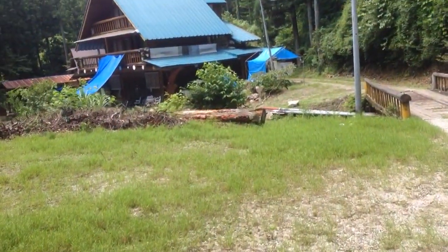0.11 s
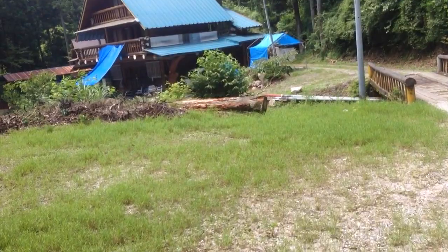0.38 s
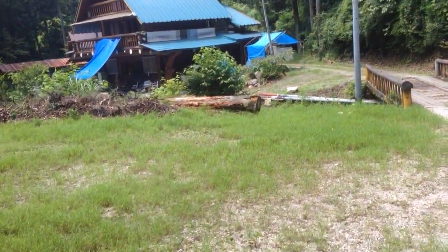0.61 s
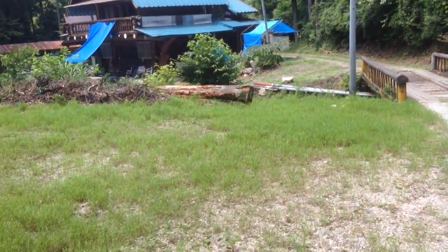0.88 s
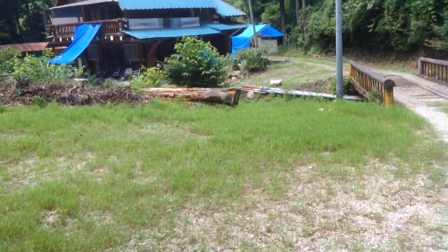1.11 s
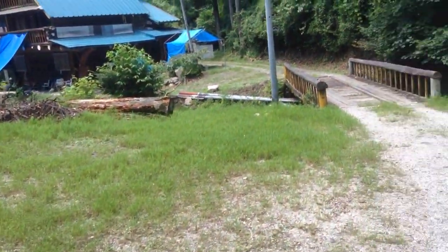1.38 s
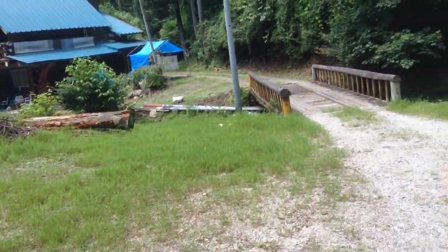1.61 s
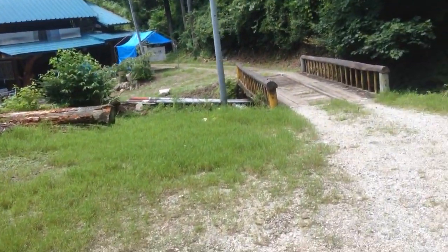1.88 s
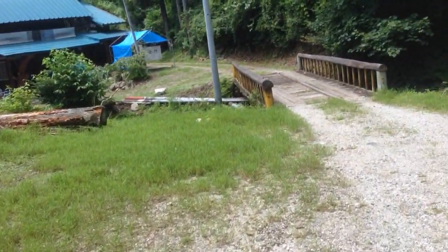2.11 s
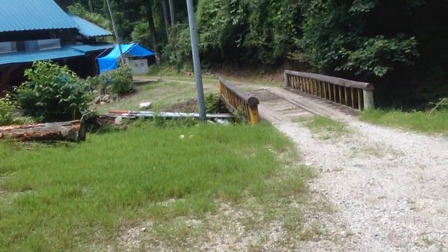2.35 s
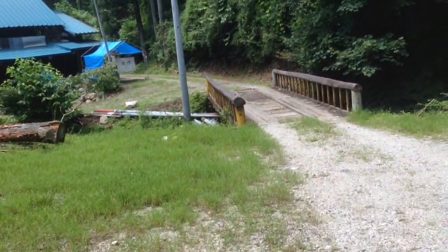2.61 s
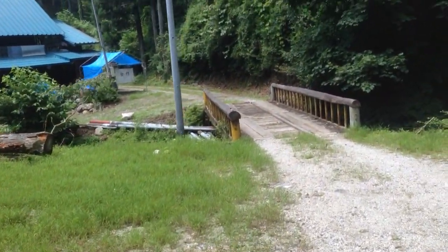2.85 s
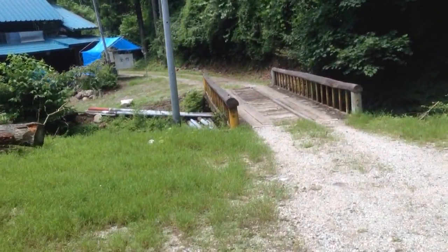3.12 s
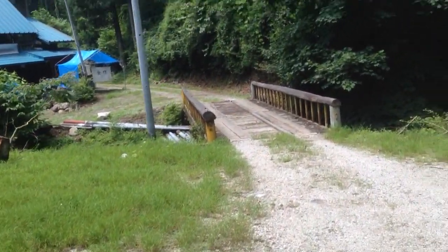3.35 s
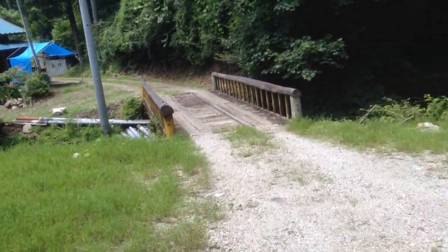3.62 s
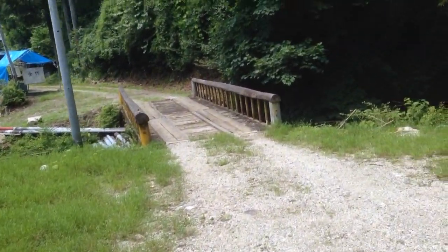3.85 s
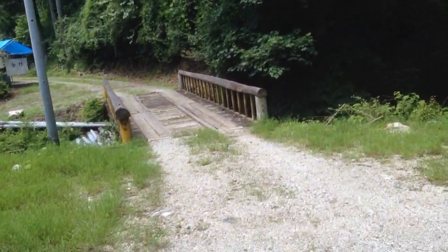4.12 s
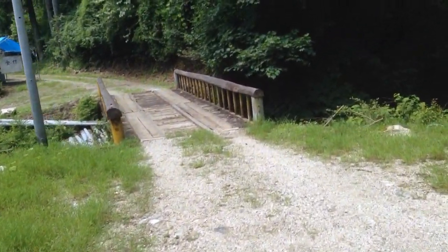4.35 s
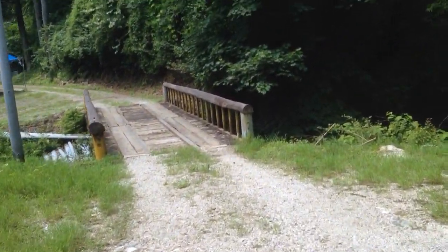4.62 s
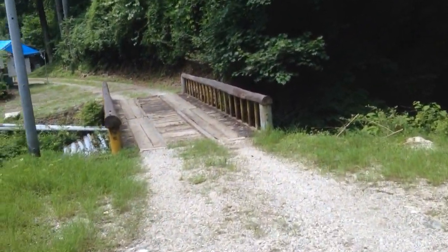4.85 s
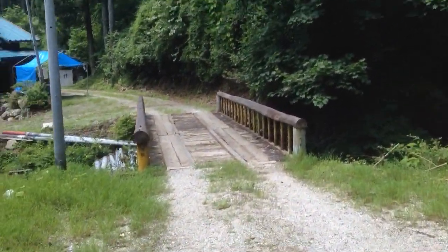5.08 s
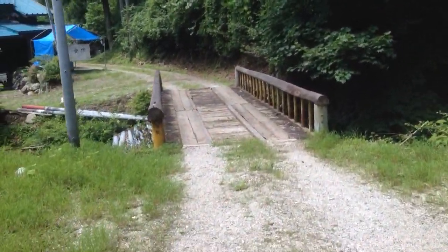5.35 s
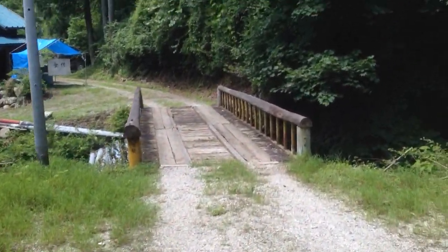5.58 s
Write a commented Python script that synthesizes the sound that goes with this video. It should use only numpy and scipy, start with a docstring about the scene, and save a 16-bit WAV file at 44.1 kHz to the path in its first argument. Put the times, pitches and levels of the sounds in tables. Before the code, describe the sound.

A mountain stream, out of sight below a grassy bank, rushes steadily from 0 to 5.7 seconds: dense bubbling wash, fine spray hiss, soft churning and low rumble, which grows slightly as the handheld mono microphone turns towards the water by about 3.5 s. Over it a cicada rasps near 8 kHz in eleven phrases of roughly 0.2 to 0.6 s with short gaps, fainter after 2.7 s. Another pipes thin pulsed notes near 4.2 kHz, about ten a second, gently falling and slowing until 3 s, then resuming higher from 4.6 s. A faint far chorus hazes behind, with a short woodland blur. Fingers rub the housing at 1.75 and 2.1 s; ticks and small knocks cluster at 2.1 to 2.35 s, with a clear click at 2.33 and another at 2.99. A soft low bump comes at 3.2, faint taps at 3.46 and 4.55, rubs at 4.0 and 5.1. At 5.68 one very loud, dry, sharp click stands out.

```python
"""Mountain stream with cicadas

A stream, made of coloured noise and bubbles, rushes out of sight below a grassy bank.
One cicada buzzes in phrases near 8 kHz (clicks ringing a body); another pipes falling notes near 4.2 kHz
(pulsed tones); a far chorus hums behind them (narrow noise). A slowly turning handheld mono microphone hears it.
Fingers on its plastic housing drag (rough grains), tick (noise bursts), knock and click sharply (short rings)."""
import sys
import numpy as np
from scipy import signal
from scipy.fft import rfft, irfft, next_fast_len
from scipy.io import wavfile
from scipy.ndimage import uniform_filter1d, map_coordinates

SR = 44100
rng = np.random.default_rng(int(sys.argv[2]) if len(sys.argv) > 2 else 0)


def master_out(mix):
    """Clip the mix to full scale and print it as 16-bit PCM to the path in sys.argv[1]."""
    frames = np.transpose(np.atleast_2d(mix))
    ceiling = np.clip(frames, -1, 1)
    pcm = np.round(ceiling * 32767).astype(np.int16)
    wavfile.write(sys.argv[1], SR, pcm)


def attenuation_scalar(level_db):
    """Turn a level in dB into a linear amplitude multiplier (20 dB per decade)."""
    decades = np.asarray(level_db, float) / 20
    return 10 ** decades


N = 252252

# the hand swings the microphone from the insects' trees (0) towards the stream (1): [t/s, turn]
MICROPHONE_TURN = [(0, 0.3), (1.0, 0.01), (2.5, 0.45), (3.5, 0.99), (4.3, 0.98), (5.72, 0.98)]
# tone colour of the stream's deep rumble: [f/Hz, relative level/dB]
RUMBLE_COLOUR = [(12, -46), (20, -24), (40, -16.5), (62, -5), (78, -9), (97, 1.5), (112, -2), (125, -8.5),
                 (150, -5.5), (200, -33), (330, -120)]
# tone colour of the churning water: [f/Hz, relative level/dB]
CHURN_COLOUR = [(82, -15), (140, -5.5), (189, 1.5), (226, -5.5), (286, -3.5), (450, -15.5), (580, -39),
                (990, -120)]
# tone colour of the foam in the rush: [f/Hz, relative level/dB]
FOAM_COLOUR = [(240, -6.5), (400, -3), (641, -3), (685, -3.5), (867, -1.5), (1120, -4), (1570, -2.5),
               (1940, -1.5), (2200, -1), (2800, -12), (3640, -43), (6160, -120)]
# tone colour of the far spray: [f/Hz, relative level/dB]
SPRAY_COLOUR = [(2400, -51), (2750, -8.5), (3100, 2.5), (3500, 3), (4500, 0), (5500, -2), (7000, -3),
                (9300, -7.5), (12000, -13.5), (15400, -16.5), (16500, -50)]
# bands of the far chorus: [f/Hz, resonance width/Hz, level at turn 0/dB, gain over the whole turn/dB]
CHORUS = [(4200, 560, -58.5, -9), (6470, 590, -67, -10), (8170, 1500, -59.5, -5)]
# buzzing phrases: [start t/s, end t/s, level/dB, swell from start to end/dB, settled belly f/Hz]
BUZZ_PHRASES = [(-.1, 0.213, -55, -4, 7800), (0.346, 0.968, -57.5, 5, 7800), (1.096, 1.507, -55.5, 0, 8000),
                (1.667, 1.934, -56, -3, 7800), (2.082, 2.576, -57.5, -2, 7860),
                (2.731, 3.154, -59.5, -1, 7980), (3.314, 3.688, -59, -3, 8000),
                (3.87, 4.11, -61.5, -4, 7804), (4.269, 4.631, -62, -2, 7600), (4.819, 5.179, -62, 0, 8140),
                (5.401, 5.66, -60.5, -3, 8000)]
# resonances of the buzzing membrane and belly: [f/Hz, width/Hz, relative level/dB]
BODY_RESONANCES = [(7120, 240, -0.5), (7600, 380, 1.5), (8000, 330, 2.5), (8550, 300, 1.5)]
# piped songs: [first note t/s, last note t/s]
PIPED_SONGS = [(.04, 3.05), (4.63, 5.66)]
# pitch of the piping: [t/s, f/Hz]
PIPED_PITCH = [(0, 4225), (.7, 4188), (1.8, 4165), (2.4, 4120), (3.05, 4070), (4.5, 4265), (5.1, 4232),
               (5.72, 4180)]
# loudness of the piping: [t/s, note level/dB, upper and lower side tone level against the note/dB]
PIPED_LEVELS = [(0, -68, -12, -10), (.3, -64, -8, -6), (.6, -59, -4, -2), (.85, -63, -8, -8),
                (1.15, -64.5, 0, -8), (1.45, -57.5, -1, -12), (1.8, -61.5, -8, -12), (2.05, -62.5, 2, -11),
                (2.4, -64, -2, -12), (2.7, -67, 4, -15), (3.05, -62, -17, -11), (4.6, -71, -12, -12),
                (4.85, -69, -15, -15), (5.0, -61, -15, -15), (5.35, -61.5, -15, -15), (5.72, -60, -19, -12)]
# skin dragging on the housing: [start t/s, end t/s, level/dB, ring f/Hz]
SKIN_RUBS = [(1.74, 1.857, -53, 1310), (2.108, 2.158, -54, 876), (2.326, 2.347, -47, 1310),
             (2.973, 2.991, -50, 1610), (4.013, 4.071, -49.5, 1510), (5.107, 5.16, -51.5, 1580),
             (5.647, 5.686, -44.5, 1600)]
# knocks on the housing: [t/s, ring level/dB, ring f/Hz, ring life/ms, snap and upper ring level against it/dB]
HOUSING_KNOCKS = [(2.121, -41, 1300, 0.13, -3, -10), (2.1643, -39, 1700, 0.2, -8, -15),
                  (2.33238, -27, 1100, 0.13, -1.5, -25), (2.3329, -30.5, 1420, 0.38, -24, -25),
                  (2.9775, -42, 1600, 0.55, -16, -23), (2.98795, -26.5, 1330, 0.4, -15, -12),
                  (3.46, -40, 1507, 0.44, -20, -27), (4.552, -42, 1600, 0.76, -20, -27),
                  (5.6756, -9, 1715, 0.39, -22, -33)]
# dry skin ticks: [t/s, peak level/dB, centre f/Hz, width/Hz]
SKIN_TICKS = [(2.121, -41, 10000, 10000), (2.1465, -51, 14800, 2000), (2.218, -50, 13800, 2500),
              (2.2385, -42, 13000, 7000), (3.4635, -47, 12000, 1800)]
# soft low bumps of the hand: [t/s, level/dB, f/Hz]
HAND_BUMPS = [(3.221, -38.5, 103), (5.578, -43.5, 96)]


def unit(x):
    """Scales a sound to rms 1."""
    return x / np.sqrt(np.mean(x ** 2) + 1e-20)


def curves(rows):
    """Joins table points with lines: one value per sample for each column after the time."""
    s, *cols = np.transpose(rows)
    return [np.interp(np.arange(N) / SR, s, c) for c in cols]


def wobble(rate):
    """A smooth random curve with this many knots a second."""
    knots = rng.standard_normal(int(N * rate / SR) + 4)
    return map_coordinates(knots, [np.arange(N) * rate / SR])


def filtered(x, response):
    """Multiplies the spectrum of x by a response to frequency."""
    m = next_fast_len(N + 8192)
    return irfft(rfft(x, m) * response(np.fft.rfftfreq(m, 1 / SR)), m)[:N]


def colour(spectrum):
    """Turns a colour table into a gain, read on a log frequency axis."""
    f, db = np.transpose(spectrum)
    return lambda hz: attenuation_scalar(np.interp(np.log(hz + 1), np.log(f + 1), db, -120, -120))


def peak(f, hz, width_hz):
    """One resonance that rings after it is struck."""
    return 1j * f * width_hz / (hz * hz - f * f + 1j * f * width_hz)


def patchy(x, depth_db, bins, frames):
    """Makes x flicker: random gain in patches of time and frequency."""
    z = signal.stft(x, nperseg=512)[2]
    field = uniform_filter1d(rng.standard_normal(z.shape), max(int(bins), 1), 0)
    field = uniform_filter1d(field, max(int(frames), 1), 1)
    return signal.istft(z * attenuation_scalar(depth_db * unit(field)), nperseg=512)[1][:N]


def turned(before_db, gained_db):
    """A level that follows the swing of the microphone."""
    return before_db + gained_db * curves(MICROPHONE_TURN)[0]


def forest(x, t60, wet_db):
    """Trunks scatter a far sound into a short blurred tail; t60 is its time to fall 60 dB, in seconds."""
    t = np.arange(SR // 2) / SR
    tail = attenuation_scalar(-60 * t / t60) * rng.standard_normal(len(t))
    return x + attenuation_scalar(wet_db) * signal.fftconvolve(x, tail / np.linalg.norm(tail))[:N]


def bubbles(count, hz, spread, cycles, spiky_db):
    """Many short bubbles of scattered size, each a damped tone rising in pitch."""
    at, size = rng.random((count, 2)).T
    pitch = np.clip(hz * np.exp(spread * rng.standard_normal(count)), 500, 4000)[:, None]
    k = np.arange(900)
    turns = pitch * k / SR
    tone = np.sin(2 * np.pi * turns * (1 + 0.00487 * turns))
    ring = tone * np.exp(-turns / cycles) * (1 - np.exp(-turns))
    ring *= attenuation_scalar(-spiky_db * np.log(size + 0.00079))[:, None]  # a few stand out
    places = (at * N).astype(int)[:, None] + k
    return unit(np.bincount(places.ravel(), ring.ravel(), N + len(k))[:N])


def stream():
    """Deep rumble, churning, a bubbling rush and smooth far spray; shared surges swell all but the rumble."""
    rumble_db = turned(-60, 4.5) + 1.7 * wobble(3.59)
    surge = wobble(16)
    churn_db = turned(-56.5, -2) + 0.074 * surge
    rush_db = turned(-51, 0.24) + 0.43 * surge
    spray_db = turned(-54.5, -1) + 0.16 * surge
    noise = rng.standard_normal((4, N))
    rumble = unit(attenuation_scalar(2.7 * wobble(50)) * filtered(noise[0], colour(RUMBLE_COLOUR)))
    churn = unit(filtered(patchy(noise[3], depth_db=1.0, bins=1.5, frames=4.7), colour(CHURN_COLOUR)))
    foam = unit(filtered(patchy(noise[1], depth_db=1.84, bins=3.7, frames=3.2), colour(FOAM_COLOUR)))
    small = bubbles(count=5000, hz=1947, spread=0.249, cycles=11, spiky_db=2.0)
    rush = unit(foam + attenuation_scalar(-7 + 1.9 * wobble(20)) * small)
    gurgles = bubbles(count=240, hz=2000, spread=0.17, cycles=33, spiky_db=1.5)  # fewer, ringing longer
    rush = unit(rush + attenuation_scalar(-11.5) * gurgles)
    spray = unit(filtered(patchy(noise[2], depth_db=0.83, bins=9, frames=11), colour(SPRAY_COLOUR)))
    low = attenuation_scalar(rumble_db) * rumble + attenuation_scalar(churn_db) * churn
    return low + attenuation_scalar(rush_db) * rush + attenuation_scalar(spray_db) * spray


def chorus():
    """Many far insects blur into narrow, flickering bands of noise."""
    out = np.zeros(N)
    for hz, width_hz, before_db, gained_db in CHORUS:
        blur = patchy(rng.standard_normal(N), depth_db=1.5, bins=1.5, frames=12)
        band = filtered(blur, lambda f: peak(f, hz, width_hz) ** 2)
        out += attenuation_scalar(turned(before_db, gained_db)) * unit(band)
    return out


def membrane_clicks(rate_hz):
    """The membrane buckles in clicks of uneven timing and strength, grouped in fives."""
    beats = np.cumsum(rate_hz * (1 + 0.00327 * wobble(25))) / SR
    when = np.interp(np.arange(1, int(beats[-1])), beats, np.arange(N))
    luck = rng.standard_normal((len(when), 2))
    when = np.clip(when + 0.82 * luck[:, 0], 8, N - 10)
    fives_db = np.resize([-11.0, -14.5, -11.0, -16.0, -14.0], len(when))
    size = attenuation_scalar(0.79 * luck[:, 1] + fives_db)
    # a windowed sinc places each click between samples
    taps = np.arange(-7, 9) + when.astype(int)[:, None]
    lag = taps - when[:, None]
    click = size[:, None] * np.sinc(lag) * np.cos(np.pi * lag / 18) ** 2
    return np.bincount(taps.ravel(), click.ravel(), N)[:N]


def buzzing_cicada():
    """Membrane clicks start each phrase fast, settle near 500 a second and ring the body."""
    t = np.arange(N) / SR
    rate_hz, effort, centre_hz = np.full(N, 500.), np.zeros(N), np.full(N, 7900.)
    fresh_hz, tired_hz, tiring_s = 515, 499, 2.4  # the settled click rate sinks as the singer tires
    settled_hz = tired_hz + (fresh_hz - tired_hz) * np.exp(-t / tiring_s)
    sag_hz_per_s = 18  # the click rate keeps sinking through a phrase
    arch_db = -0.5  # below zero: the middle of a phrase is eased down a little
    for start, end, db, swell_db, belly_hz in BUZZ_PHRASES:
        since = np.clip(t - start, 0, None)
        now = t >= start
        rate_hz[now] = (settled_hz + 30 * np.exp(-since / 0.081) - sag_hz_per_s * since)[now]
        # the belly tightens as a phrase opens
        centre_hz[now] = (belly_hz - 400 * np.exp(-since / 0.067))[now]
        gate = np.clip(since / 0.049, 0, 1) * np.clip((end - t) / 0.062 + 0.54, 0, 1)
        level_db = np.interp(t, [start, end], [db - swell_db / 2, db + swell_db / 2])
        arch = np.sin(np.pi * np.clip(since / (end - start), 0, 1)) - 0.8
        effort += gate * attenuation_scalar(level_db + arch_db * arch)
    centre_hz = centre_hz + 110 * wobble(7.13)
    rasp = unit(membrane_clicks(rate_hz)) + .3 * rng.standard_normal(N)
    body = np.zeros(N)
    for k, (hz, width_hz, db) in enumerate(BODY_RESONANCES):
        ring = filtered(rasp, lambda f: peak(f, hz, width_hz) * peak(f, 7660, 2600))
        # resonances far from the belly's pitch weaken; neighbours have opposite sign
        body += (-1) ** k * attenuation_scalar(db - 8.7 * ((hz - centre_hz) / 1000) ** 2) * ring
    # leaves and trunks on the way recolour the buzz
    return effort * attenuation_scalar(1.0 * wobble(10)) * unit(patchy(body, depth_db=2.0, bins=2.5, frames=36))


def note_pulses():
    """Soft notes, evenly spaced at first; a song longer than twelve gaps slows towards its end."""
    lead = 4000  # samples of a note ahead of its centre
    # one row each for the main, upper and lower tones
    pulses, t = np.zeros((3, N + SR)), np.arange(-lead, 8000) / SR
    swell = np.exp(-.5 * (t / 0.011) ** 2) + 0.38 * np.exp(-np.abs(t) / np.where(t > 0, 0.09, 0.04))
    k = np.arange(40)
    # after twelve even gaps the delay grows with the square of the count
    gap_s, drag_s, scatter_s = .1023, 0.000563, .009
    for first, last in PIPED_SONGS:
        times = first + gap_s * k + drag_s * np.clip(k - 12, 0, None) ** 2
        for s, luck in zip(times, rng.standard_normal((40, 4))):
            if s < last + gap_s / 2:
                scatter_db = luck[1:, None] * [[2.5], [3], [3]]
                at = max(round((s + scatter_s * luck[0]) * SR), 0)
                pulses[:, at:][:, :len(t)] += attenuation_scalar(scatter_db) * swell
    return pulses[:, lead:][:, :N]


def piping_cicada():
    """A thin falling tone pulsed into notes; a flutter of the membrane adds a side tone on either side."""
    main, upper, lower = note_pulses()
    hz, = curves(PIPED_PITCH)
    hz = hz + 16 * wobble(10)
    tone = lambda f: np.sin(2 * np.pi * np.cumsum(f) / SR)
    db, upper_db, lower_db = curves(PIPED_LEVELS)
    partials = main * (tone(hz) + attenuation_scalar(-7) * tone(hz * 3 / 2) + attenuation_scalar(-3.5) * tone(hz / 2))
    sides = attenuation_scalar(upper_db) * upper * tone(hz + 175) + attenuation_scalar(lower_db) * lower * tone(hz - 150)
    rasp = 1 + 0.35 * wobble(120)  # the uneven membrane roughens every partial
    return rasp * attenuation_scalar(db) * (partials + sides)


def rubs():
    """Dragging skin slips in dense rough grains that ring the housing."""
    out, t = np.zeros(N), np.arange(N) / SR
    grain = rng.standard_normal(N) * attenuation_scalar(2.5 * wobble(250))
    for start, end, db, hz in SKIN_RUBS:
        stroke = np.clip(np.minimum(t - start, end - t) / (0.16 * (end - start)), 0, 1)
        out += attenuation_scalar(db) * stroke * unit(filtered(grain, lambda f: peak(f, hz, 970) ** 2))
    return out


def knocks():
    """A knock swells and rings the housing briefly, with a bright snap and an upper ring."""
    out, ms = np.zeros(N + SR), np.arange(600) / SR * 1000
    # the finger touches once more, 2.4 ms later and much softer
    rebounds = [(s + 0.0024, db - 36, *rest) for s, db, *rest in HOUSING_KNOCKS]
    for s, db, hz, life_ms, snap_db, upper_db in HOUSING_KNOCKS + rebounds:
        u = ms / life_ms
        bent_ms = ms - 0.14 * (1 - np.exp(-ms / 0.48))  # the pitch rises as contact stiffens
        ring = -u ** 2 * np.exp(-u) * np.sin(2 * np.pi * hz * bent_ms / 1000)
        snap = np.exp(-ms / 0.33) * np.sin(2 * np.pi * 4900 * ms / 1000)
        upper = ms / 0.7 * np.exp(1 - ms / 0.7) * np.sin(2 * np.pi * 2550 * ms / 1000)
        knock = ring / np.abs(ring).max() + attenuation_scalar(snap_db) * snap + attenuation_scalar(upper_db) * upper
        out[round(s * SR):][:len(ms)] += attenuation_scalar(db) * knock
    # thin out the sound below 640 Hz
    return filtered(out[:N], lambda f: 1 / np.sqrt(1 + (640 / (f + 1)) ** 6))


def ticks():
    """A dry skin slip is a thin bright burst of noise that dies in a few milliseconds."""
    out, ms = np.zeros(N + SR), np.arange(600) / SR * 1000
    for s, db, hz, width_hz in SKIN_TICKS:
        burst = np.exp(-ms / 2.1) * rng.standard_normal(len(ms))
        slip = filtered(burst, lambda f: peak(f, hz, width_hz))[:len(ms)]
        out[round(s * SR):][:len(ms)] += attenuation_scalar(db) * slip / np.abs(slip).max()
    return out[:N]


def bumps():
    """A soft push of the hand is one low, quickly damped swing."""
    out, t = np.zeros(N + SR), np.arange(1500) / SR
    for s, db, hz in HAND_BUMPS:
        swing = np.sin(2 * np.pi * hz * t) * np.e * t / 0.0079 * np.exp(-t / 0.005)
        out[round(s * SR):][:len(t)] -= attenuation_scalar(db) * swing
    return out[:N]


def scene():
    """One microphone hears every source and feeds both channels."""
    buzzing = forest(buzzing_cicada(), t60=0.069, wet_db=-3.0)
    piping = forest(piping_cicada(), t60=0.25, wet_db=-7)
    handling = rubs() + knocks() + ticks() + bumps()
    return np.tile(stream() + chorus() + buzzing + piping + handling, (2, 1))


def low_pass(x):
    """Removes everything above the highest recorded frequency."""
    return signal.sosfilt(signal.butter(12, 15440, fs=SR, output="sos"), x)


def record(dry):
    """Both channels lose everything from 15290 Hz up."""
    mix = np.array([filtered(channel, lambda f: f < 15290) for channel in dry])
    return low_pass(mix)


dry = scene()
out = record(dry)
master_out(out)
```